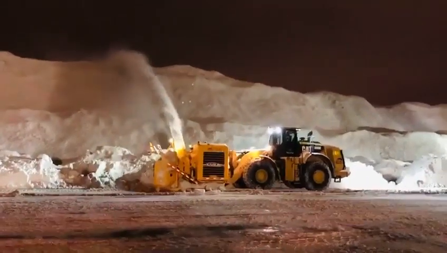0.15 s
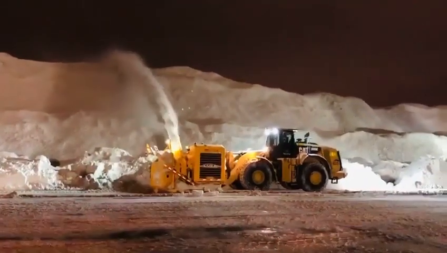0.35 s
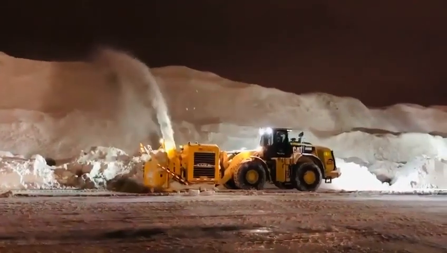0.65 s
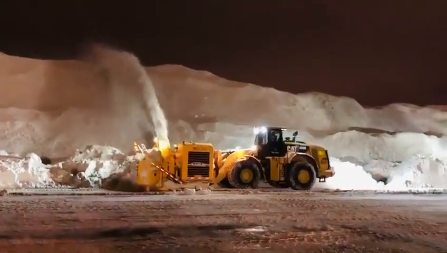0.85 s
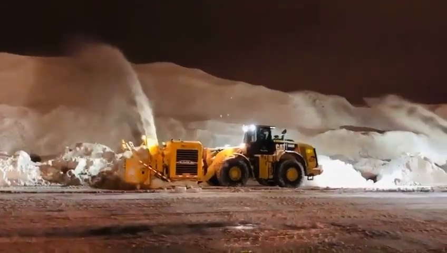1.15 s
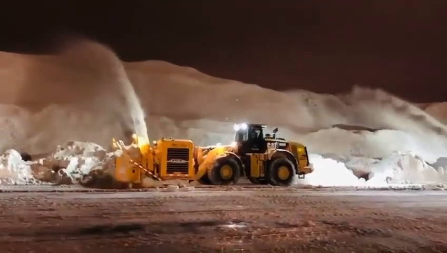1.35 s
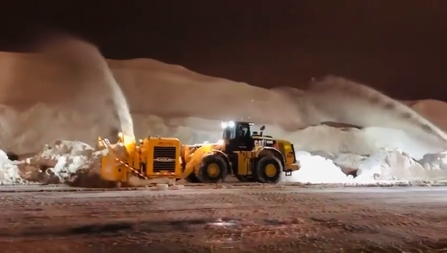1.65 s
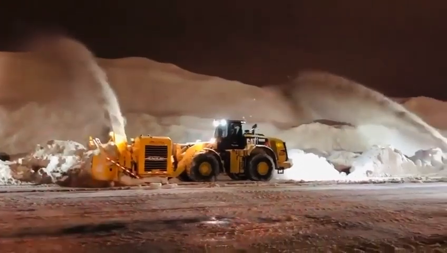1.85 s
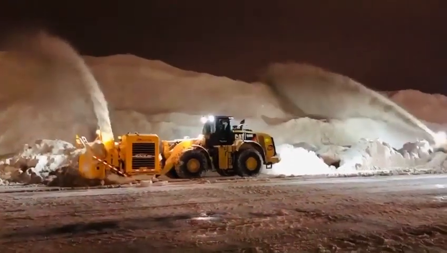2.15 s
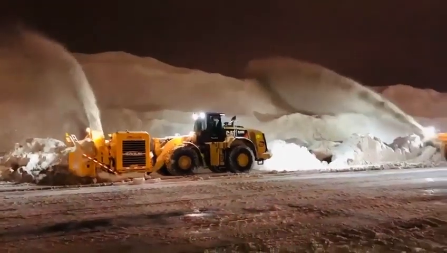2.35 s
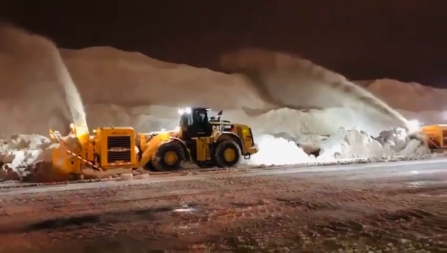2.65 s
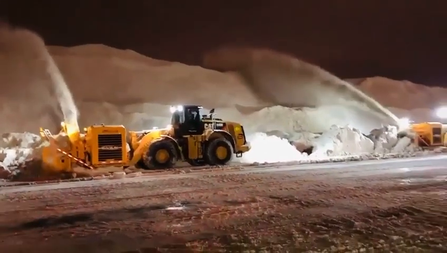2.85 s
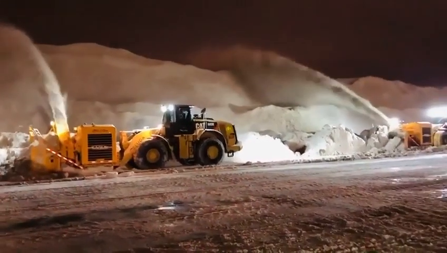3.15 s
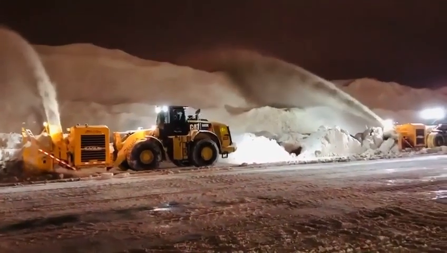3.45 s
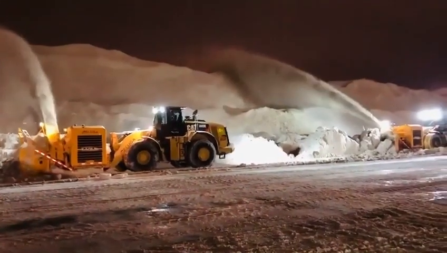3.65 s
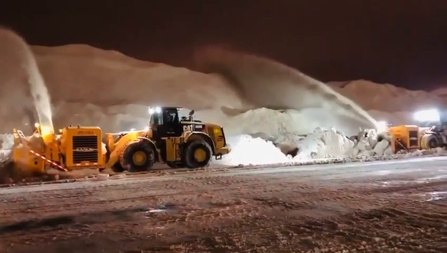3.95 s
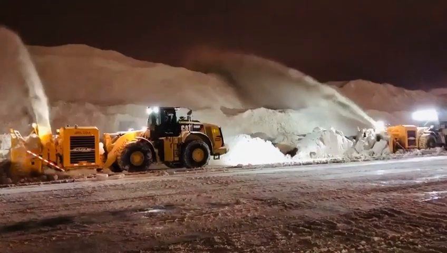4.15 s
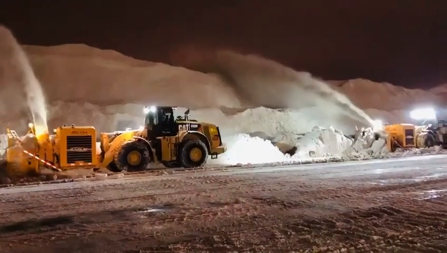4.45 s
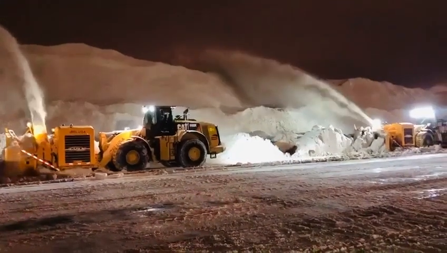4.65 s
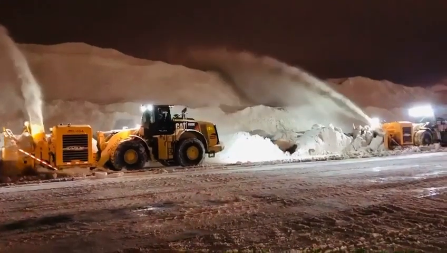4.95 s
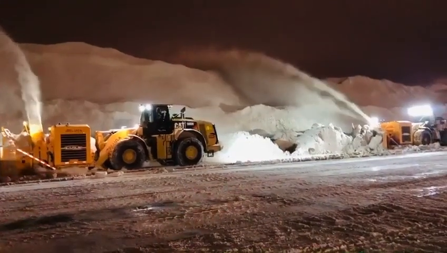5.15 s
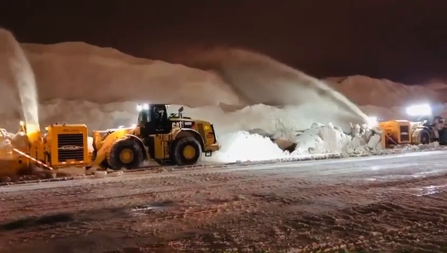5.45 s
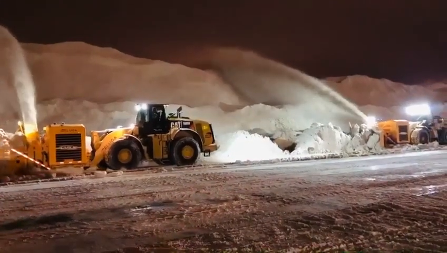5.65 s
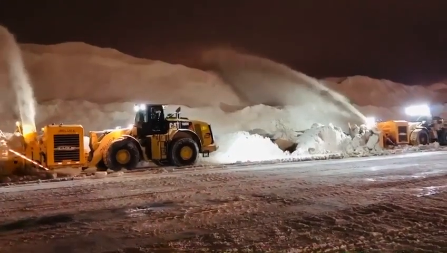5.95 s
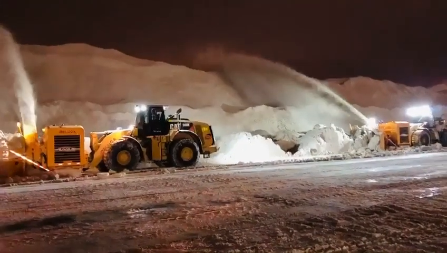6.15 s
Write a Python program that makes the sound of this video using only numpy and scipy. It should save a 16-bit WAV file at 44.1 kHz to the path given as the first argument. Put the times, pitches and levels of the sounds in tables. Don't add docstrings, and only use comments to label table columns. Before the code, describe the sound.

Loud steady diesel drone with deep rumble and roaring snow spray, a humming fan winding down, and one brief low ice scrape late.

```python
import sys
import numpy as np
from scipy import signal
from scipy.fft import next_fast_len
from scipy.io import wavfile
from scipy.ndimage import uniform_filter1d

SR = 44100
rng = np.random.default_rng(int(sys.argv[2]) if len(sys.argv) > 2 else 0)


def field_ratio(decibels):
    return 10 ** (np.asarray(decibels, dtype=float) / 20)


def store_wav(level_fs):
    pcm = np.round(np.clip(np.atleast_2d(level_fs), -1, 1) * 32767)
    wavfile.write(sys.argv[1], SR, pcm.T.astype(np.int16))


N = 278260
TIME = np.arange(N) / SR
# (time [s], level [dB])
AWAY = [(0, -0.5), (1.5, 0), (2.2, -1), (2.9, -1.5), (3.7, -1), (5.3, -3.5), (6.31, -3.5)]


def evened(x):
    return x / np.sqrt(np.mean(x ** 2) + 1e-20)


def read(points, hz):
    f, db = np.transpose(points)
    return np.interp(np.log(hz + 1), np.log(f + 1), db, left=-120, right=-120)


def columns(table):
    s, *rest = np.transpose(table)
    return [np.interp(TIME, s, c) for c in rest]


def bump(s, half_s):
    return np.exp(-((TIME - s) / half_s) ** 2)


def wander(rate_hz):
    hz = np.geomspace(.05, 1, 24) * rate_hz
    t = TIME[::256]
    waves = np.sin(2 * np.pi * (hz * t[:, None] + rng.random(24)))
    slow = (waves / np.sqrt(hz)).sum(1)
    return np.interp(TIME, t, evened(slow))


def turbulence(near, turned, size, patchy_db):
    frames, hz = 4 * N // size + 5, np.fft.rfftfreq(size, 1 / SR)
    a, b, patches = rng.standard_normal((frames, len(hz), 3)).T
    patches = uniform_filter1d(patches, size=10, axis=0)
    patches = evened(uniform_filter1d(patches, size=12, axis=1))
    share = np.linspace(0, 1, frames)
    colour = field_ratio(read(near, hz)[:, None] * (1 - share) + read(turned, hz)[:, None] * share)
    colour = colour / np.linalg.norm(colour, axis=0)
    z = (a + 1j * b) * colour * field_ratio(patchy_db * patches)
    return evened(signal.istft(z, nperseg=size, noverlap=3 * size // 4)[1][:N])


def tone(turns, db, flutter_db):
    level = np.sqrt(2) * field_ratio(db + flutter_db * wander(rate_hz=14))
    return level * np.sin(2 * np.pi * (turns + rng.random()))


def fan():
    # (time [s], blade rate [Hz], level [dB])
    run_down = [(.1, 172.5, -18.5), (.45, 171.5, -22.5), (1.5, 170.6, -22), (2.25, 165.9, -20.5),
                (2.85, 164, -20.5), (3.75, 157.1, -21), (4.35, 150, -19), (4.65, 145.8, -15.5),
                (4.85, 142.6, -22), (5.25, 136, -20), (5.55, 131.9, -20.5), (5.85, 127.2, -29),
                (6.15, 123.3, -41)]
    # (frequency [Hz], level [dB])
    shroud = [(240, -46), (285, -34.5), (300, -35), (313, -39.5), (322, -32), (336, -30), (342, -32),
              (350, -32)]
    # (harmonic number, level against the third [dB])
    top_harmonics = [(4, -9), (5, -11)]
    hz, db = columns(run_down)
    turns = np.cumsum(hz * (1 + .001 * wander(rate_hz=6))) / SR
    third_db = -37.5 - 0.16 * (hz[0] - hz)
    first = tone(turns, db, flutter_db=.9)
    second = tone(2 * turns, read(shroud, 2 * hz), flutter_db=2.5)
    upper = [(3, 0.014), *top_harmonics]
    return first + second + sum(tone(k * turns, third_db + up, flutter_db=2.0) for k, up in upper)


def diesel():
    # (time [s], twice the firing rate [Hz])
    speed = [(0, 184.6), (.45, 184.8), (1.05, 190), (1.8, 193.4), (2.25, 192.2), (2.8, 194.3),
             (3.45, 191.8), (3.75, 194), (4.35, 195.2), (4.65, 193.1), (4.95, 188.6), (5.25, 188.3),
             (5.55, 191.2), (5.9, 193), (6.31, 193.5)]
    multiples = [1, .5, .75, 1.25]
    resting_db = [-30, -39.5, -37.5, -45.5]
    # (multiple, level [dB])
    weak_orders = [(1.5, -37.5), (.25, -53.5), (1.75, -42.5), (2, -42.5), (7 / 12, -43), (2 / 3, -32.5)]
    # (time [s], order index, rise [dB], half-length [s])
    swells = [(1, 0, 6, .3), (1.989, 0, 6.5, .2), (3.937, 0, 4, .3), (4.4, 0, -24.5, .2), (4.85, 0, 5, .25),
              (5.94, 0, 2.5, 0.64), (0, 1, 14, .3), (3.148, 1, 9.5, 0.36), (4.089, 1, 12.5, .15),
              (0.91, 2, 16.5, .25), (2.387, 2, 12, 0.42), (3.3, 2, 12, 0.34), (5.06, 2, 14, 0.36),
              (5.81, 2, 14.5, .15), (3.797, 3, 12, 0.22), (4.353, 3, 19, .35), (5.5, 3, 13.5, .15)]
    turns = np.cumsum(columns(speed)[0] * (1 + 0.0026 * wander(rate_hz=8))) / SR
    strong = np.zeros(N)
    for i, (k, db) in enumerate(zip(multiples, resting_db)):
        swell_db = sum(up * bump(s, half_s) for s, which, up, half_s in swells if round(which) == i)
        strong += tone(k * turns, db + swell_db, flutter_db=0.2)
    weak = sum(tone(round(12 * k) / 12 * turns, db, flutter_db=2.5) for k, db in weak_orders)
    return strong + weak, turns


def rumble():
    # (frequency [Hz], density [dB per Hz])
    deep_near = [(15, -43.5), (35, -31), (60, -10.5), (80, -6), (92, -2), (118, -3.5), (140, -1.5),
                 (152, -3.5), (165, -11.5), (200, -13.5), (230, -21.5), (300, -63.5)]
    deep_turned = [(15, -40), (35, -27.5), (60, -13.5), (80, -6.5), (92, -3.5), (118, -3.5), (140, -2),
                   (152, -3.5), (165, -9), (200, -12), (230, -16), (300, -60)]
    upper_near = [(150, -42.5), (195, -4), (220, -4), (240, -1), (285, 1), (315, -9.5), (345, -8),
                  (372, -4.5), (395, -16), (450, -22), (600, -60.5)]
    upper_turned = [(150, -43.5), (195, -0.5), (220, -1.5), (240, -0.5), (285, -4), (315, -11), (345, -5),
                    (372, -8), (395, -20.5), (450, -23.5), (600, -60)]
    away_db = columns(AWAY)[0]
    deep = turbulence(deep_near, deep_turned, size=8192, patchy_db=1.88)
    upper = turbulence(upper_near, upper_turned, size=4096, patchy_db=-0.2)
    return field_ratio(-19.5 + .2 * away_db) * deep + field_ratio(-22.5 + 1.4 * away_db) * upper


def rush(turns):
    # (frequency [Hz], density [dB per Hz])
    roar_near = [(220, -27.5), (380, -4.5), (399, -17.5), (444, -11), (506, -4), (568, -8), (692, 0.5),
                 (757, -5.5), (835, 3.5), (1080, -2.5), (1510, -2.5), (2060, -12.5), (2390, -23.5),
                 (2700, -23), (3510, -49), (5940, -120)]
    roar_turned = [(220, -31), (380, -11.5), (444, -2.5), (515, -4.5), (587, -4), (637, -6.5), (692, -0.5),
                   (782, -5.5), (849, -1), (1010, -3), (1170, -4.5), (1570, -5), (1790, -9), (2700, -21.5),
                   (3510, -44.5), (5940, -120)]
    hiss_near = [(1290, -30), (2200, 0), (2480, -6.5), (2890, -3.5), (3210, 1.5), (3480, 0), (3830, 0.5),
                 (4310, -6), (5020, -11), (5420, -11.5), (6780, -9), (8140, -18), (9000, -17),
                 (11700, -45.5), (19800, -120)]
    hiss_turned = [(1290, -31.5), (2200, -0.5), (2360, -2.5), (2660, -9), (2900, -3), (3150, -4.5),
                   (3360, -1.5), (3630, -7), (3760, -4.5), (5390, -12.5), (8390, -17), (9000, -24),
                   (11700, -55.5), (19800, -120)]
    # (time [s], rise [dB], half-length [s])
    bites = [
        (0, 1.5, 0.012),
        (0.496, 0.5, 0.047),
        (1.082, 0, 0.04),
        (1.5, -0.3, 0.12),
        (1.955, 0.4, 0.11),
        (5.46, 1.4, .06),
    ]
    away_db = columns(AWAY)[0]
    bite_db = sum(db * bump(s, half_s) for s, db, half_s in bites)
    roar = turbulence(roar_near, roar_turned, size=1024, patchy_db=0.87)
    hiss = turbulence(hiss_near, hiss_turned, size=512, patchy_db=1.03)
    surge_db = .4 * wander(rate_hz=30) + .2 * np.cos(np.pi * turns)
    hiss_db = -31.5 + 1.46 * away_db + bite_db + surge_db
    return field_ratio(-20.5 + away_db + bite_db) * roar + field_ratio(hiss_db) * hiss


def wind():
    calm_db, gust_db, gust_s, rise_s = -52, 15, 5.9, .3
    low = signal.butter(4, [30, 44], "bandpass", fs=SR, output="sos")
    level_db = calm_db + gust_db / (1 + np.exp((gust_s - TIME) / rise_s))
    return field_ratio(level_db) * evened(signal.sosfilt(low, rng.standard_normal(N)))


def ice_scrapes():
    # (time [s], level [dB], start [Hz], end [Hz], length [s])
    lumps = [
        (5.05, -22.5, 370, 560, .13),
        (5.19, -32, 560, 620, .04),
        (3.4, -45, 7000, 8200, .08),
    ]
    out = np.zeros(N)
    for s, db, start_hz, end_hz, length_s in lumps:
        noise = rng.standard_normal(8000)[:round(length_s * SR)]
        glide_hz = np.geomspace(start_hz, end_hz, len(noise))
        turn = np.exp(2j * np.pi * np.cumsum(glide_hz) / SR)
        lowpass = signal.butter(2, 0.17 * end_hz, fs=SR, output="sos")
        smooth = signal.sosfilt(lowpass, noise / turn)
        puff = signal.windows.tukey(len(noise), 1) * evened((smooth * turn).real)
        out[round(s * SR):][:len(noise)] += field_ratio(db) * puff
    return out


def scene():
    orders, turns = diesel()
    return (fan() + orders + rumble() + rush(turns) + wind() + ice_scrapes())[None]


def coarse_rounding(x, jitter_db):
    # (frequency [Hz], rounding step against the local level [dB])
    step_db = [(20, -24), (60, -18), (300, -9), (700, -1.5), (1200, 2), (1700, 4), (2500, 6), (3300, 4.5),
               (4200, 6), (5300, 7.5), (6800, 7.5), (8000, 9.5), (8800, 11.5), (9400, 14)]
    hop, first, bins, band = 1024, 132, 432, 16
    n, k = np.arange(2 * hop)[:, None] + .5, np.arange(bins) + .5
    basis = np.cos(np.pi / hop * (n + hop / 2) * k) * np.sin(np.pi * n / (2 * hop))
    padded = np.pad(x, (hop - first, 2 * hop))
    z = np.lib.stride_tricks.sliding_window_view(padded, 2 * hop)[::hop] @ basis
    power = uniform_filter1d((z ** 2).reshape(len(z), -1, band).mean(2), size=9, axis=0)
    jitter = rng.standard_normal(power.shape) + rng.standard_normal((len(z), 1))
    jitter = evened(jitter + np.roll(jitter, 1, axis=0))
    local = np.repeat(np.sqrt(power) * field_ratio(jitter_db * jitter), band, axis=1)
    step = local * field_ratio(read(step_db, k * SR / (2 * hop)))
    whole = np.floor(abs(z / step) ** .75 + .4054)
    frames = (np.sign(z) * whole ** (4 / 3) * step) @ basis.T * 2 / hop
    late = (frames[1:, :hop] + frames[:-1, hop:]).ravel()
    return np.concatenate([x[:first], late])[:N]


def band_limit(x):
    return signal.sosfilt(signal.butter(12, 9480, fs=SR, output="sos"), x)


def record(dry):
    ceiling = 1.1
    soft = ceiling * np.tanh(dry[0] / ceiling)
    rounded = coarse_rounding(soft, jitter_db=1.1)
    analytic = signal.hilbert(rounded, next_fast_len(N))[:N]
    turned = (analytic * np.exp(.08j)).real
    return band_limit(turned[None])


dry = scene()
out = record(dry)
store_wav(out)
```